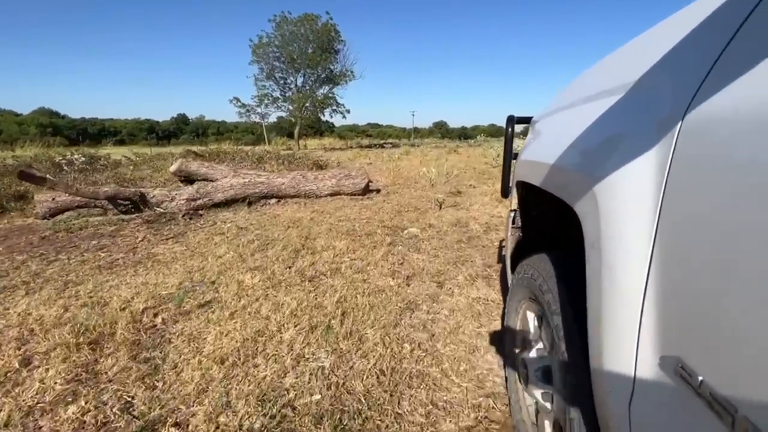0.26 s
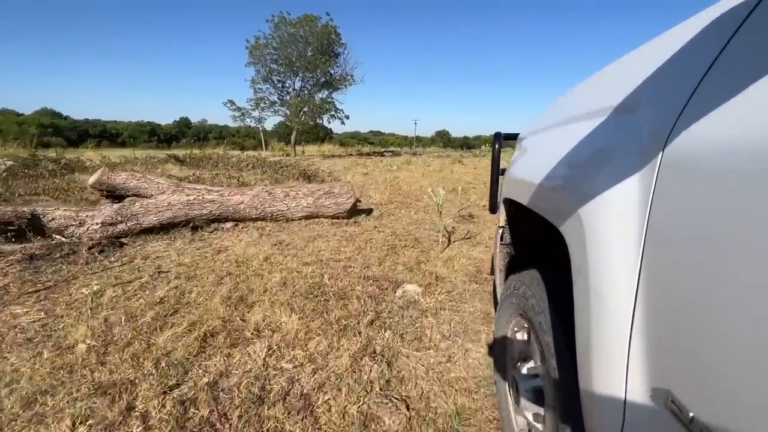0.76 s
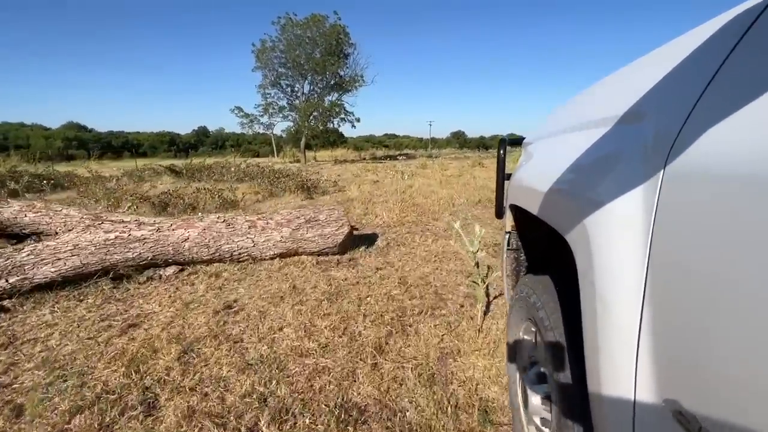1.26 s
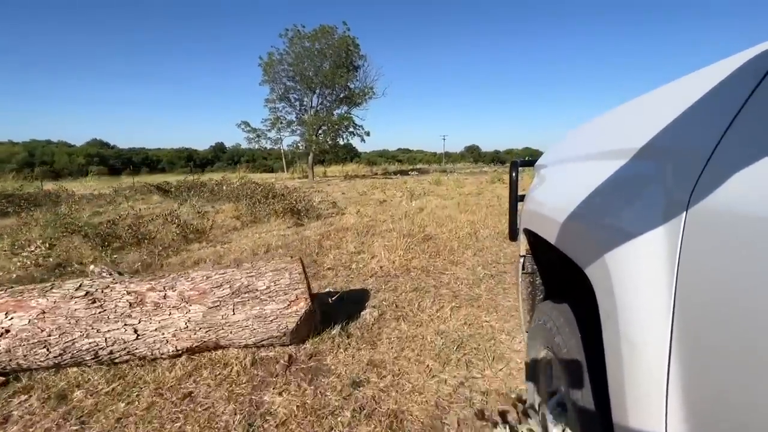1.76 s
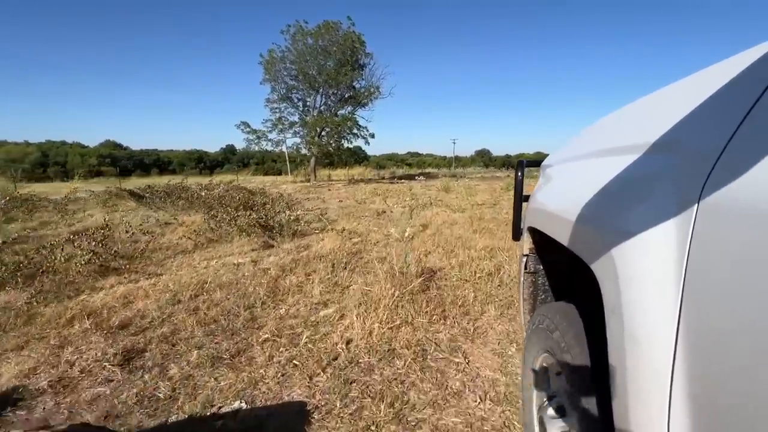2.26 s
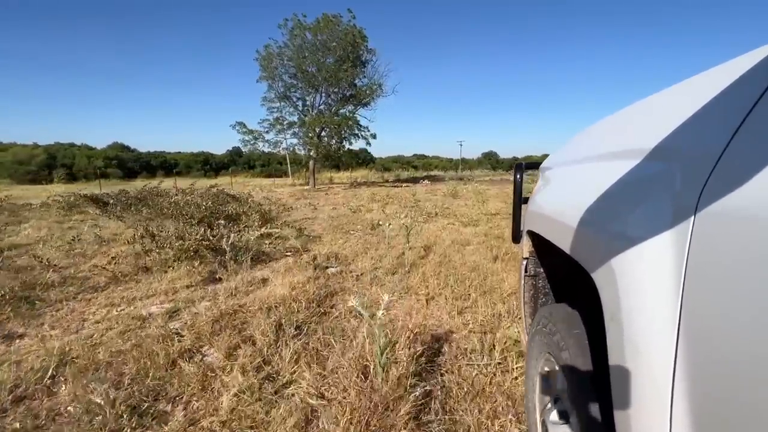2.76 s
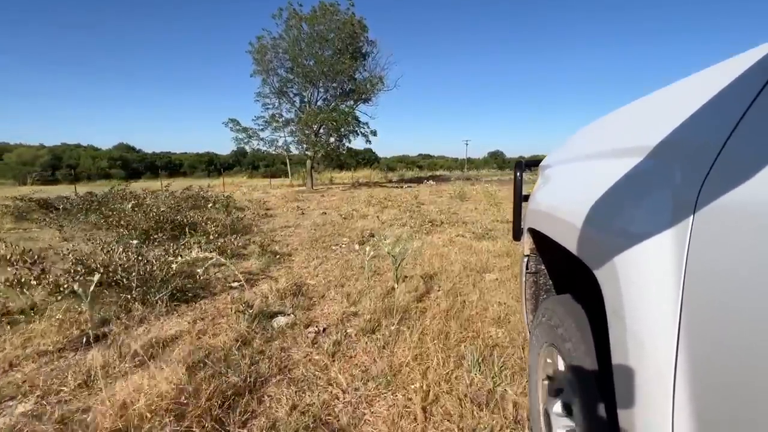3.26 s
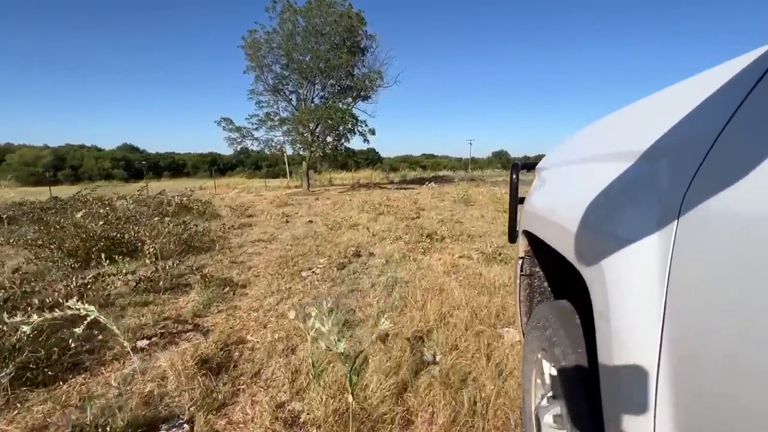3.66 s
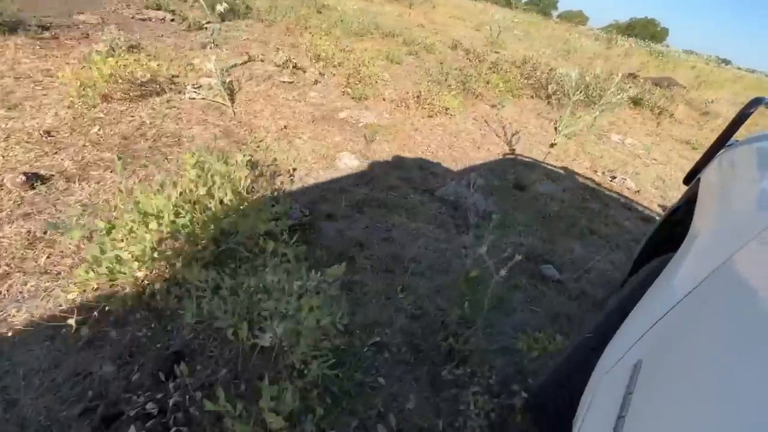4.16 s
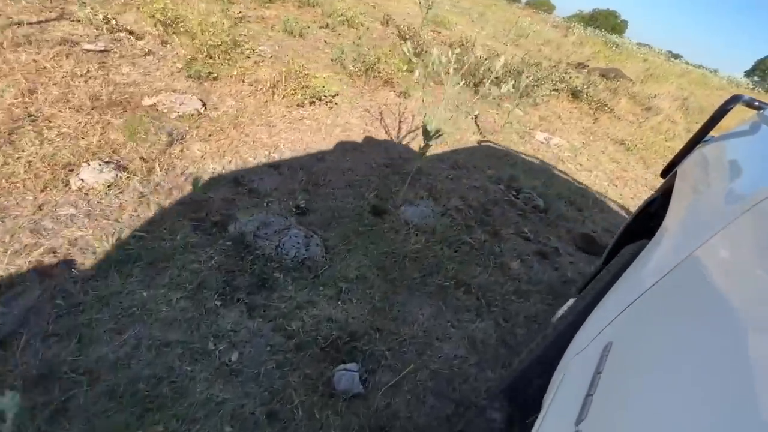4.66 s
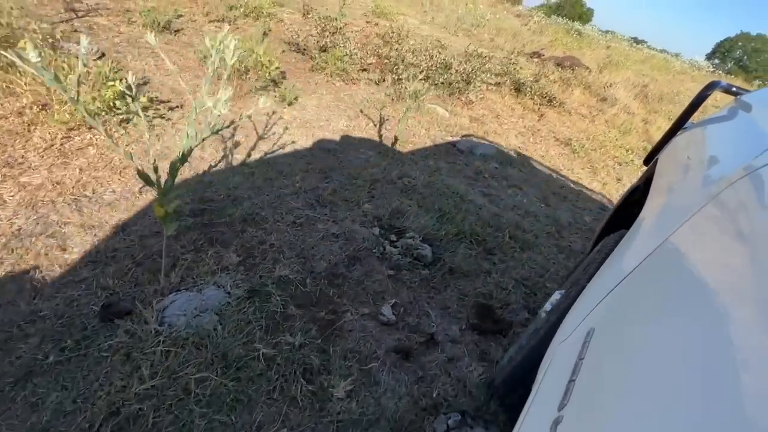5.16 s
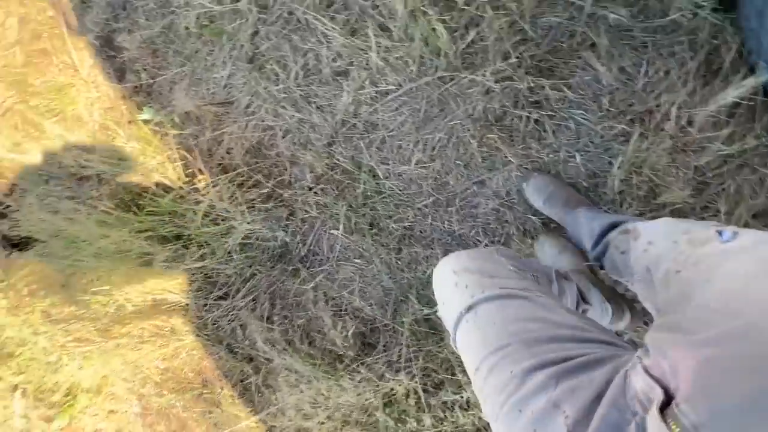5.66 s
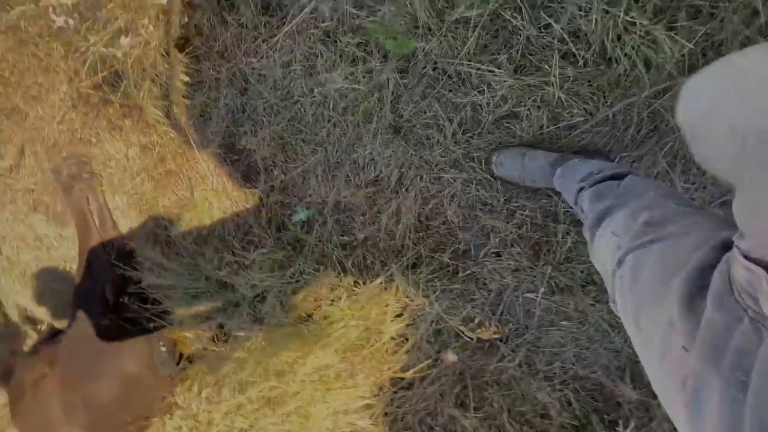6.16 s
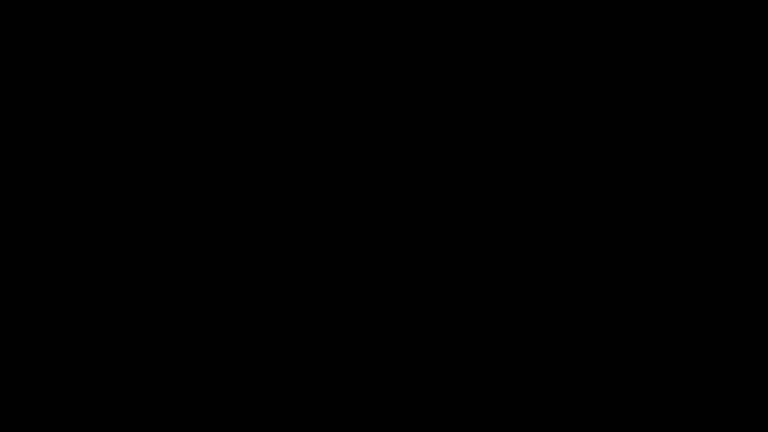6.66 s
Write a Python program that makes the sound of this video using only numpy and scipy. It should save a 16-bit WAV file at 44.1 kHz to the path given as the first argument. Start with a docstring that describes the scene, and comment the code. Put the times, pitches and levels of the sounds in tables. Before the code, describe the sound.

A pickup truck creeps across a dry pasture, heard from its open side window. The exhaust drones, drops to a burble, then swells again, while tyres crunch grass, twigs snap and sticks knock underneath. A weed scrapes squeakily along the body. The sound cuts suddenly to quiet footsteps in grass, cloth rubbing and finger taps on the microphone, with grasshoppers clicking as it all fades.

```python
"""A pickup truck creeps over a dry pasture, heard from its open side window. Its exhaust drones
when the driver gives gas and burbles when the truck coasts. Tyres crush dry grass, twigs snap,
grasshoppers fly up on clicking wings and a tall weed scrapes along the body.
Then, suddenly, someone walks through grass by a pond while an engine idles far off.
A grasshopper clicks away and everything fades out."""
import sys
import numpy as np
from scipy import signal
from scipy.fft import rfft, irfft, next_fast_len
from scipy.io import wavfile

SR = 44100
rng = np.random.default_rng(int(sys.argv[2]) if len(sys.argv) > 2 else 0)


def to_wav(s):
    """Save 16-bit WAV."""
    ch = np.atleast_2d(s).T  # columns
    pcm = np.round(np.clip(ch, -1, 1) * 32767)  # PCM
    wavfile.write(sys.argv[1], SR, pcm.astype(np.int16))


N = 304731
TIME = np.arange(N) / SR
FFT_SIZE = next_fast_len(N)
FREQS = np.fft.rfftfreq(FFT_SIZE, 1 / SR)
SIDES = np.array([[.5], [-.5]])   # splits a difference between left and right


def from_db(db):
    """Turn decibels into a number to multiply by. A decay_s is the time to fall 60 dB."""
    return 10 ** (np.asarray(db) / 20)


def rms_one(x):
    """Scale a signal so its average power is 1."""
    return x / np.sqrt(np.mean(x ** 2) + 1e-20)


def in_time(rows):
    """Join a table's points with lines, giving each column a value at every sample."""
    times, *columns = np.transpose(rows)
    return [np.interp(TIME, times, column) for column in columns]


def at_hz(points):
    """Join a table's points with lines, giving a value at every frequency."""
    hz, value = np.transpose(points)
    return np.interp(np.log(FREQS + 1), np.log(hz), value)


def colour(spectrum):
    """How strong each frequency is, falling steeply beyond the ends of the table."""
    low, high = spectrum[0][0], spectrum[-1][0]
    return from_db(at_hz(spectrum)) / (1 + (low / (FREQS + 1)) ** 8) / (1 + (FREQS / high) ** 8)


def filtered(x, order, hz, kind):
    """Keep the low part, the high part or one band of a sound."""
    return signal.sosfilt(signal.butter(order, hz, kind, fs=SR, output="sos"), x)


def panned(left_db):
    """Two gains that make the left side left_db louder than the right."""
    return from_db(SIDES * left_db)


def placed(sound, start_s):
    """Put a short sound into a silent stereo track."""
    track, start = np.zeros((2, N)), int(start_s * SR)
    track[:, start:start + sound.shape[-1]] = sound[..., :N - start]
    return track


def drift(per_s):
    """A random wobble about 1 in size that picks a new target per_s times a second."""
    targets = rng.standard_normal(4000)
    return rms_one(np.interp(TIME * per_s, np.arange(len(targets)), targets))


def grains(per_s, spread_db, smooth):
    """Many tiny cracks of uneven size over a smooth hiss."""
    cracks = rng.random((2, N)) < per_s / SR
    sizes = from_db(spread_db * np.minimum(rng.exponential(1, (2, N)), 4))
    return rms_one(cracks * sizes * rng.choice([-1, 1], (2, N))) + smooth * rng.standard_normal((2, N))


def swell(peak_s, length_s, db, roundness, rise_share=.4):
    """The power of a sound that rises and falls; length_s is its width 10 dB below the peak."""
    away = np.maximum((peak_s - TIME) / rise_share, (TIME - peak_s) / (1 - rise_share)) / length_s
    return from_db(db - 10 * np.minimum(away ** roundness, 10)) ** 2


def swells(rows, floors_db, roundness):
    """One level curve in dB for each layer: a steady floor plus a swell for every row."""
    levels_db = []
    for layer, floor_db in enumerate(floors_db):
        power = sum(swell(s, length_s, peaks_db[layer], roundness) for s, length_s, *peaks_db in rows)
        levels_db.append(10 * np.log10(from_db(floor_db) ** 2 + power))
    return levels_db


# How alike left and right sound (0 unrelated, 1 the same): pitch_hz, likeness
EAR_LIKENESS = [(45, 0.23), (80, 1), (115, 0.56), (200, 0.8), (340, 0.66), (540, 0.64), (700, 0.58),
                (830, 0.46), (1200, 0.57), (1650, 0.05), (2200, 0.46), (4000, 0.061), (9000, 0.05),
                (13000, 0.47)]
def shaped(pair, gain, left_db=0, lead_rad=0):
    """Blend two unrelated signals into stereo with the given tone colour and a power of 1."""
    middle, side = rfft(pair, FFT_SIZE)
    alike = at_hz(EAR_LIKENESS)
    both = np.sqrt(1 + alike) * middle + np.sqrt(1 - alike) * side * [[1], [-1]]
    paths = panned(left_db) * np.exp(1j * lead_rad * SIDES)
    return rms_one(irfft(both * gain * paths, FFT_SIZE)[:, :N])


# How much louder the left side is at the truck: pitch_hz, left_db
WINDOW_BALANCE = [(100, 1), (200, 0.5), (380, -2), (520, -5), (680, -14.5), (900, -5), (1300, 1.5),
                  (2400, -3), (4400, 4.5), (6000, 10.5), (8100, 1), (15000, -1)]
# How far the left wave runs ahead of the right: pitch_hz, lead_rad
WINDOW_LEAD = [(160, -0.9), (300, -0.43), (450, -1.48), (620, -1.56), (740, -0.65), (1000, 0.099),
               (1350, -1.63), (1900, -.5), (2600, -1.1), (3600, -1.05), (5000, 0.61)]
def at_window(pair, gain=1, staggered=False):
    """Sound reaches the two ears at different levels and, if staggered, at different times."""
    return shaped(pair, gain, at_hz(WINDOW_BALANCE), at_hz(WINDOW_LEAD) if staggered else 0)


# Puffs of wind: peak_s, length_s, level_db
GUSTS = [(.13, .18, -26), (.42, .25, -34), (1.95, .04, -28), (2.1, .12, -29.5), (2.22, .13, -26),
         (2.36, .06, -29), (3.83, .1, -30), (5.2, .06, -35)]
# The tone colour of their rumble: pitch_hz, level_db
WIND_COLOUR = [(40, -3.5), (75, -3), (140, -4.5), (300, -21)]
def wind():
    """Each puff rumbles on the microphone's two openings separately."""
    noise = rfft(rng.standard_normal((2, N)), FFT_SIZE)
    rumble = irfft(noise * colour(WIND_COLOUR), FFT_SIZE)[:, :N]
    return rms_one(rumble) * np.sqrt(sum(swell(*gust, roundness=1.4) for gust in GUSTS))


# How loud the far engine is: time_s, level_db
IDLE_LEVEL = [(5.4, -60), (5.6, -59.5), (6.0, -63), (6.16, -53.5), (6.28, -58), (6.42, -60.5), (6.9, -55)]
def far_engine(pitch_hz=74):
    """An engine idles far away: a low hum that wavers a little."""
    phase = 2 * np.pi * np.cumsum(pitch_hz * (1 + .01 * drift(6.3))) / SR
    level_db, = in_time(IDLE_LEVEL)
    return rms_one(np.sin(phase) + .081 * np.sin(2 * phase)) * from_db(level_db)


# The notes of the microphone's hollow case: pitch_hz, relative_db, decay_s
CASE_NOTES = [(240, -10.5, 0.029), (527, -3.5, 0.023), (1000, -1.5, 0.021), (1350, -1.5, .012),
              (1740, 3, 0.025)]
# Finger taps on it: start_s, strength_db, brightness_hz, left_db
TAPS = [(5.445, -33, 220, -9), (5.643, -50, 1700, 15), (5.79, -41, 900, 16), (5.918, -45, 280, 0),
        (6.417, -50.5, 900, 12), (6.481, -48, 800, -17), (6.594, -50, 1000, -12), (6.619, -44, 800, -15),
        (6.662, -44, 400, -11), (6.755, -45, 610, -4)]
def finger_taps():
    """Fingers knock on the hand-held microphone; a soft touch leaves only the low thud."""
    t = np.arange(SR // 10) / SR
    ring = sum((-1) ** k * np.sin(2 * np.pi * hz * t) * from_db(db - 60 * t / decay_s)
               for k, (hz, db, decay_s) in enumerate(CASE_NOTES))
    return sum(placed(filtered(ring, 2, brightness_hz, "low"), start_s) * from_db(db) * panned(left_db)
               for start_s, db, brightness_hz, left_db in TAPS)


# The walker's strides: peak_s, length_s, swish_db, rub_db, tread_db
STRIDES = [(5.85, 0.24, -50, -56.5, -63.5), (5.91, 0.033, -49, -64, -61), (6.025, 0.1, -66, -51, -64),
           (6.075, .09, -72, -52, -65), (6.12, 0.055, -70, -52, -60), (6.2, 0.16, -76, -68, -64),
           (6.48, 0.13, -52.5, -57, -63), (6.62, 0.077, -52, -58, -58), (6.76, 0.11, -69, -57, -59)]
# Tone colours of rubbing cloth, swishing grass, soft ground and breaking stems: pitch_hz, level_db
SLEEVE_COLOUR = [(25, -3), (70, 6.5), (130, 0.5), (200, -10.5), (330, -12), (480, -10), (680, -13),
                 (950, -9.5), (1250, -11.5), (1550, -6.5), (1760, -1.5), (2100, -8.5), (2700, -22),
                 (3500, -14)]
SWISH_COLOUR = [(1500, -12), (2800, -7), (4200, -7), (4900, -1), (5400, -5), (6500, 2), (8200, -1),
                (9600, 3), (11000, -6), (12200, 3), (17000, -1)]
TREAD_COLOUR = [(130, -4), (220, -3), (380, 0.5), (540, -3), (720, -8), (980, -1), (1250, -5)]
CRUNCH_COLOUR = [(1500, -10), (2600, -0.5), (4500, 3), (5300, 3.5), (5800, 6.5), (7000, 1), (8500, 6),
                 (10000, 4.5), (15000, -80.5)]
def walker(clump_db=2.5):
    """Boots swish through grass and thud on soft ground while a sleeve rubs close by on the left."""
    swish_db, rub_db, tread_db = swells(STRIDES, floors_db=(-60, -61, -74), roundness=1.2)
    sleeve_left_db = at_hz([(300, 2.1), (600, 2.3), (1200, 1.3), (1750, 8.9), (2800, 8)])
    rub = shaped(grains(per_s=580, spread_db=-.5, smooth=1), colour(SLEEVE_COLOUR), sleeve_left_db)
    swish = shaped(grains(per_s=1500, spread_db=2, smooth=1.1), colour(SWISH_COLOUR))
    swish *= from_db(swish_db + clump_db * drift(60))
    tread = shaped(grains(per_s=160, spread_db=3, smooth=.6), colour(TREAD_COLOUR))
    crunch = shaped(grains(per_s=500, spread_db=2, smooth=.67), colour(CRUNCH_COLOUR))
    crunch *= from_db(-55 + 1.56 * (swish_db + 50))   # dry stems crunch only under firmer strides
    return rub * from_db(rub_db) + swish + crunch + tread * from_db(tread_db)


# Short spurts of grasshopper flight: start_s, length_s, level_db
FLIGHTS = [(.08, .2, -45), (.28, .12, -39), (.45, .03, -38), (4.94, .13, -41), (5.14, .05, -40),
           (6.015, .05, -45), (6.35, .04, -43), (6.39, .07, -35.5), (6.585, .14, -42), (6.75, .04, -42),
           (6.79, .06, -34), (6.85, .05, -38)]
def grasshoppers(wingbeat_hz=52.6, slow_from_s=6.4155, slowing_hz_per_s=15, decay_s=.0036):
    """Each wingbeat makes one dry, very high click; the last flight slows as the insect lands."""
    beat_hz = wingbeat_hz - slowing_hz_per_s * np.maximum(TIME - slow_from_s, 0)
    beats = np.cumsum(beat_hz) / SR
    since_click_s = (beats - np.interp(slow_from_s, TIME, beats)) % 1 / beat_hz
    flying = sum(from_db(db) * ((TIME > s) & (TIME < s + length_s)) for s, length_s, db in FLIGHTS)
    hiss = rms_one(filtered(rng.standard_normal(N), 2, 8500, "high"))
    return hiss * flying * from_db(-60 * since_click_s / decay_s)


# Taller tufts that the truck runs over: peak_s, length_s, crunch_db, straw_db
TUFTS = [(.3, 0.46, -53, -52), (1.2, 0.71, -51.5, -53), (1.8, 0.83, -51, -55.5), (2.99, 0.75, -44, -43),
         (3.18, .25, -54, -48), (3.55, 0.78, -53, -55.5), (3.945, 0.2, -43.5, -41.5),
         (4.15, 0.18, -51, -58.5), (4.84, 0.13, -47, -69), (5.07, 0.15, -51.5, -63)]
# The tone colour of fine straw: pitch_hz, level_db
STRAW_COLOUR = [(4000, -30), (7000, -8), (8400, 0), (10000, -1), (11000, -7), (12200, 2), (15000, 1),
                (17000, -3)]
def crushed_grass(short_grass_db=(-52.5, -57), clump_db=1.5):
    """Stems break in clumps under the tyres while fine straw brushes the body."""
    crunch_db, straw_db = swells(TUFTS, short_grass_db, roundness=.88)
    crunch = at_window(grains(per_s=2200, spread_db=2, smooth=1.46), colour(CRUNCH_COLOUR))
    straw = at_window(grains(per_s=900, spread_db=3.8, smooth=.8), colour(STRAW_COLOUR))
    crunch *= from_db(crunch_db + clump_db * drift(60))
    straw *= from_db(straw_db + clump_db * drift(60))
    return crunch + straw


# Twigs under the tyres: start_s, level_db, pitch_hz, decay_s
TWIGS = [(1.009, -46, 11000, .02), (1.606, -26.5, 850, 0.018), (1.606, -41, 2900, 0.022),
         (1.772, -35.5, 8400, 0.07), (1.772, -41, 2600, .2), (1.876, -45, 12100, .03),
         (1.881, -39.5, 12100, .04), (2.214, -44, 7750, 0.097), (2.886, -39, 12000, .02),
         (2.98, -41, 6000, 0.047), (3.063, -40, 11000, .025), (3.39, -37, 11980, .02),
         (3.848, -31.5, 4600, 0.0072), (3.849, -40.5, 4000, .22), (3.85, -44.5, 2100, 0.2),
         (3.89, -45, 4400, 0.18), (4.145, -37, 9000, .025), (4.288, -38.5, 2900, 0.03),
         (4.307, -43.5, 12500, .02), (4.816, -44.5, 2570, 0.24), (5.384, -41, 3980, 0.061)]
def snapping_twigs(band_ratio=2.08):
    """Each break is a band of noise that jumps up and dies away."""
    t = np.arange(SR // 4) / SR
    snaps = 0
    for start_s, db, hz, decay_s in TWIGS:
        band_hz = [hz / band_ratio, min(hz * band_ratio, .45 * SR)]
        # noise that both ears share, plus some for each ear alone
        noise = rng.standard_normal(2 * len(t)) + rng.standard_normal((2, 2 * len(t)))
        for _ in range(2):
            noise = filtered(noise, 1, band_hz, "band")
        envelope = (1 - np.exp(-np.pi * hz * t)) * from_db(db - 60 * t / decay_s)
        snaps += placed(rms_one(noise)[:, len(t):] * envelope, start_s)
    return snaps


def strike(start_s, db, hz, decay_s, notes):
    """A blow makes a part ring with a few notes that die away together."""
    t = np.arange(SR // 4) / SR
    ring = sum(from_db(note_db) * np.sin(2 * np.pi * hz * ratio * t + rng.normal(0, .69, (2, 1)))
               for ratio, note_db in notes)
    return placed(ring * (1 - np.exp(-hz * t)) * from_db(db - 60 * t / decay_s), start_s)


# Dull knocks and bright pings under the truck: start_s, level_db, pitch_hz, decay_s
KNOCKS = [(1.608, -25.5, 522, .13), (2.035, -28, 221, .15), (2.218, -27, 230, .13), (3.815, -22, 96, .15),
          (4.355, -35, 791, .1), (4.733, -35, 400, .08), (4.795, -33, 850, .1), (5.168, -29, 230, .13)]
PINGS = [(1.607, -38, 1857, .058), (1.836, -38.5, 1780, .07), (1.948, -46, 2900, .07),
         (3.45, -47, 3700, .07), (3.848, -45, 1720, .16)]
# The notes inside each knock and ping: pitch_ratio, relative_db
KNOCK_NOTES = [(.68, -6), (1, 0.5), (1.8, -11.5), (2.25, -11)]
PING_NOTES = [(.96, -5), (0.999, 3), (1.05, -14)]
def underbody_hits():
    """Sticks, stones and ruts knock on the underside; stiff stalks make thin metal ring."""
    knocks = sum(strike(*knock, KNOCK_NOTES) for knock in KNOCKS)
    return knocks + sum(strike(*ping, PING_NOTES) for ping in PINGS)


# How loudly the weed rasps: time_s, level_db
RASP_LEVEL = [(2.88, -53), (2.965, -41), (2.995, -32.5), (3.02, -34.5), (3.06, -35.5), (3.15, -41),
              (3.3, -51)]
# The tone colour of the scraped panel: pitch_hz, level_db
PANEL_COLOUR = [(500, -27), (800, 8.5), (1100, 2), (1550, 4), (1900, -1), (2300, -9), (3500, -7.5)]
# The stalk's slips: start_s, length_s, from_hz, to_hz, level_db
SQUEAKS = [(2.92, .07, 1270, 1370, -42), (2.985, .03, 1020, 1170, -33), (2.987, .032, 830, 810, -33.5),
           (2.998, .045, 1340, 1400, -38), (3.032, .03, 1460, 1410, -35), (3.06, .065, 1440, 1340, -39)]
def weed_scrape(pitch_wobble=.0496):
    """A stalk catches on a panel, then slips along it: a rasp with short, shaky squeaks."""
    rasp_db, = in_time(RASP_LEVEL)
    rasp = shaped(grains(per_s=1100, spread_db=2.5, smooth=.5), colour(PANEL_COLOUR))
    squeaks = 0
    for start_s, length_s, from_hz, to_hz, db in SQUEAKS:
        progress = np.clip((TIME - start_s) / length_s, 0, 1)
        hz = (from_hz + (to_hz - from_hz) * progress) * (1 + pitch_wobble * drift(500))
        envelope = np.sin(np.pi * progress) * from_db(db + 2 * drift(300))
        squeaks += np.sin(2 * np.pi * np.cumsum(hz) / SR) * envelope
    return rasp * from_db(rasp_db) + squeaks


# Loose parts of the truck: pitch_hz, level_db, decay_s
LOOSE_PARTS = [(232.4, -49.5, 0.08), (341, -49.5, 0.098), (408, -53, 0.088), (504, -53.5, .07),
               (818, -55, .05), (1092, -54.5, 0.053), (1317, -57.5, .04)]
def rattle(bumps_per_s=24, spread_db=5):
    """Small bumps come at random; each one jolts every loose part by a different amount."""
    bumps = rng.random(N) < bumps_per_s / SR
    parts = 0
    for hz, db, decay_s in LOOSE_PARTS:
        jolts = bumps * from_db(spread_db * rng.uniform(-1, 1, (2, N))) * rng.choice([-1, 1], (2, N))
        kept, step_rad = from_db(-60 / (decay_s * SR)), 2 * np.pi * hz / SR   # both per sample
        ring = signal.lfilter([0, 1], [1, -2 * kept * np.cos(step_rad), kept ** 2], jolts + 1e-18)
        parts += from_db(db) * rms_one(ring)
    return at_window(parts, staggered=True) * np.std(parts)


# The notes of belt and fan: times_firing_rate, width_hz, relative_db
WHINES = [(5.7, 45, -48.5), (12.5, 70, -48), (15.2, 60, -50.5)]
def whine(firings, tone_db):
    """Belt and fan sing rough notes that follow the engine's speed and weaken off the gas."""
    throttle = np.clip((tone_db + 38) / 8, 0, 1)
    notes = 0
    for multiple, width_hz, db in WHINES:
        phase = 2 * np.pi * multiple * firings
        ears = [drift(2 * width_hz) * np.cos(phase) + drift(2 * width_hz) * np.sin(phase)
                for _ in range(2)]
        notes += from_db(db) * np.array(ears)
    return at_window(notes, staggered=True) * np.std(notes) * from_db(-10.5 + 7 * throttle)


# The tone colour of fan, gears and tyres: pitch_hz, level_db
RUNNING_COLOUR = [(180, -18), (220, -6), (290, -6), (360, -5.5), (420, -7), (480, -7), (560, -11),
                  (670, -15), (800, -12.5), (1040, -13.5), (1300, -13.5), (1700, -18.5), (2600, -27.5),
                  (4000, -28.5)]
def running_noise(firings, level_db, bass_boost_db, throb=.015, flutter_db=.9):
    """Fan, gears and tyres make a dense clatter that throbs faintly as the engine fires."""
    clatter = grains(per_s=900, spread_db=1.3, smooth=1) * (1 + throb * np.cos(2 * np.pi * firings))
    clatter = at_window(clatter, colour(RUNNING_COLOUR), staggered=True)
    # more bass makes it duller, as when heard from lower beside the door
    extra_bass = (from_db(bass_boost_db) - 1) * filtered(clatter, 1, 380, "low")
    return (clatter + extra_bass) * from_db(level_db + flutter_db * drift(50))


# The low notes of the cab and exhaust: pitch_hz, width_hz, relative_db
BOOM_NOTES = [(53, 18, -3.5), (68, 26.5, 2), (90.1, 19.5, 2), (135.7, 31, -1.5), (157, 26.7, 0)]
def body_boom(level_db, tone_db, lumpy_db=.5):
    """Uneven firing and rough ground shake the cab and exhaust into a low rumble."""
    power = sum(from_db(db) ** 2 / (1 + 2 * ((FREQS - hz) / width_hz) ** 2) ** 2
                for hz, width_hz, db in BOOM_NOTES)
    deep_bass_cut = FREQS ** 2 / (FREQS ** 2 + 25 ** 2)
    rumble = at_window(rng.standard_normal((2, N)), np.sqrt(power) * deep_bass_cut)
    # a hard-working engine fires evenly, so the burble around its tone dies down
    working = np.clip((tone_db + 35) / 6, 0, 1)
    hard_push = np.clip((tone_db + 26) / 3, 0, 1)
    burble = filtered(rumble, 1, [68, 102], "band")
    octave_burble = filtered(rumble, 1, [120, 180], "band")
    rumble = rumble - .6 * working * burble - .5 * hard_push * octave_burble
    return rumble * from_db(level_db + lumpy_db * drift(25))


def exhaust(firings, tone_db, octave_db, third_db=-22, fourth_db=-21, right_lead_rad=.23):
    """The engine's firings, no two quite equal, blend into a low tone with higher tones above it."""
    phase = 2 * np.pi * firings + .04 * drift(25) - right_lead_rad * SIDES
    strength = 1 + .08 * drift(45)
    overtones = (np.cos(2 * phase) + from_db(third_db) * np.sin(3 * phase)
                 + from_db(fourth_db) * np.sin(4 * phase))
    drone = from_db(tone_db) * np.cos(phase) + from_db(octave_db) * overtones
    return -np.sqrt(2) * strength * drone * panned(.96)


# The driver holds the gas, coasts, then pushes twice: time_s, firing_hz, tone_db, octave_db
ENGINE = [(0, 84.5, -29.3, -43), (.8, 83.4, -28.5, -44), (1.03, 86.5, -29, -42), (1.5, 85.3, -26, -39),
          (1.75, 84.8, -28, -42), (2.02, 84.2, -28.3, -43), (2.2, 81, -25.2, -40), (2.42, 71, -38, -41),
          (2.7, 72.3, -39, -41), (3.3, 70, -40, -42), (3.56, 74, -37, -39), (3.62, 77, -29.5, -35),
          (3.74, 82, -23.5, -30), (3.87, 77, -25.5, -31), (4.02, 80.3, -23, -26),
          (4.16, 82.2, -21.6, -24.4), (4.29, 80.2, -22.5, -25.4), (4.37, 77, -29, -30),
          (4.54, 74, -34.5, -36.5), (4.9, 79, -34.5, -40), (5.4, 83, -34.5, -38)]
# How rough the ground is: time_s, boom_db, running_db, bass_boost_db
GROUND = [(0, -31, -36.5, 1.5), (.7, -31.5, -36.5, -1), (1.7, -29.5, -35, -1), (2.6, -33.5, -36.5, -0.5),
          (3.4, -33, -37.5, -0.5), (4.7, -29, -39.5, 2), (5.4, -32.5, -41.5, 5)]
def truck():
    """The rolling pickup, with the wind and everything it runs over or brushes past."""
    firing_hz, tone_db, octave_db = in_time(ENGINE)
    boom_db, running_db, bass_boost_db = in_time(GROUND)
    firings = np.cumsum(firing_hz) / SR   # how many times the engine has fired so far
    machine = exhaust(firings, tone_db, octave_db) + body_boom(boom_db, tone_db)
    machine += running_noise(firings, running_db, bass_boost_db)
    machine += (whine(firings, tone_db) + rattle()) * from_db(running_db - running_db.mean())
    pasture = crushed_grass() + wind() + weed_scrape()
    debris = (snapping_twigs() + underbody_hits()) * panned(2.2)
    return machine + pasture + debris


def scene(pond_at_s=5.401, switch_s=.011, fade_end_s=6.93, fade_s=.53):
    """The drive switches suddenly to the walk, which fades out; grasshoppers fly in both."""
    on_foot = np.clip((TIME - pond_at_s) / switch_s + .5, 0, 1)
    fade = np.clip((fade_end_s - TIME) / fade_s, 0, 1) ** 1.2
    drive = truck() * (1 - on_foot)
    walk = (far_engine() + walker() + finger_taps()) * on_foot
    return drive + (walk + grasshoppers()) * fade


# Dips in the microphone's treble (depth 1 is a full cut): pitch_hz, narrowness_q, depth
MIC_DIPS = [(7550, 12, 1), (10780, 13, .95)]
def record(dry, cutoff_hz=15750):
    """The microphone loses two narrow bands of treble, and the very top is cut off."""
    for hz, q, depth in MIC_DIPS:
        notched = signal.lfilter(*signal.iirnotch(hz, q, fs=SR), dry)
        dry = dry + depth * (notched - dry)
    return signal.sosfilt(signal.ellip(10, .2, 80, cutoff_hz, fs=SR, output="sos"), dry)


dry = scene()
out = record(dry)
to_wav(out)
```